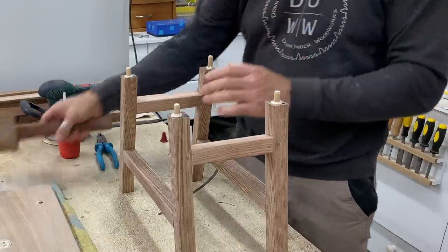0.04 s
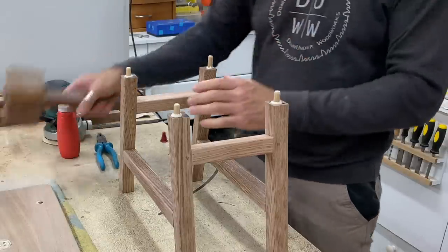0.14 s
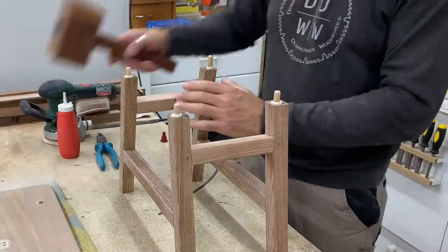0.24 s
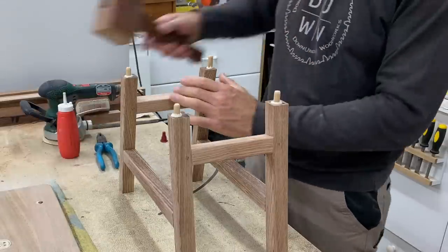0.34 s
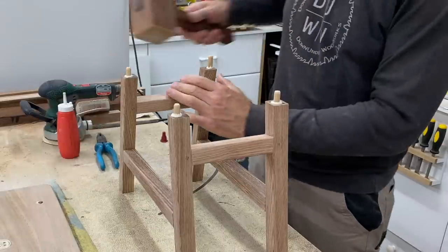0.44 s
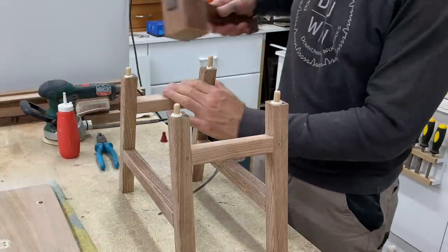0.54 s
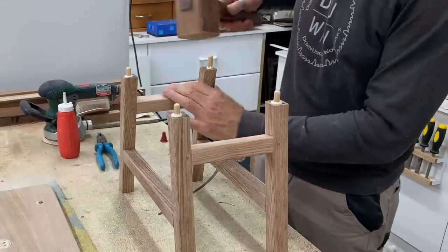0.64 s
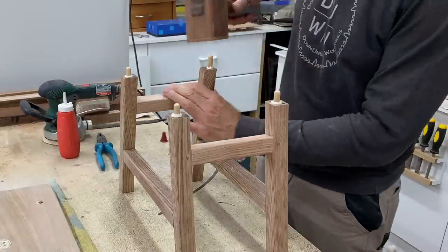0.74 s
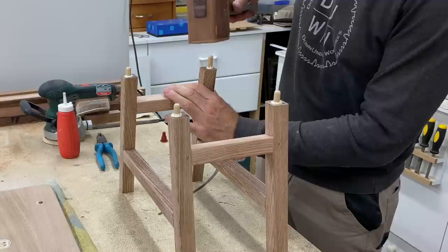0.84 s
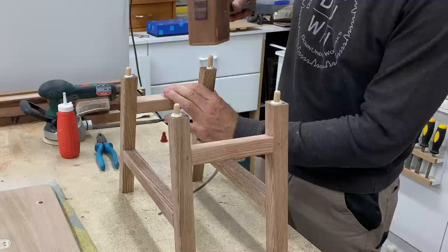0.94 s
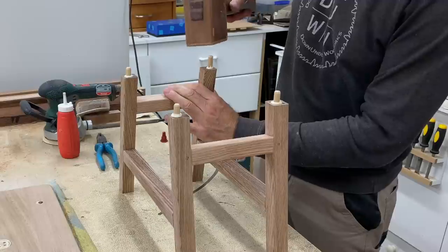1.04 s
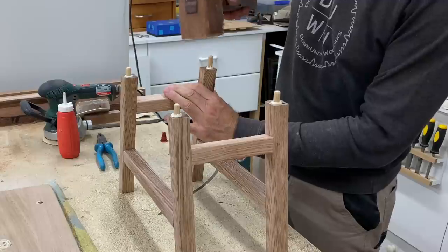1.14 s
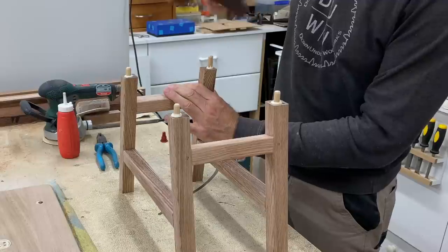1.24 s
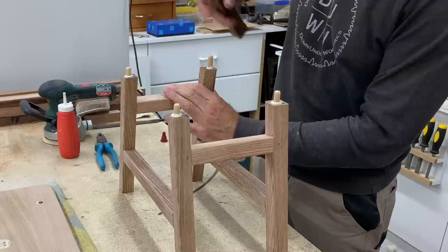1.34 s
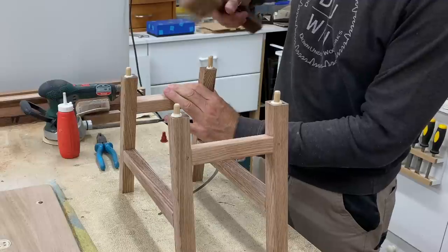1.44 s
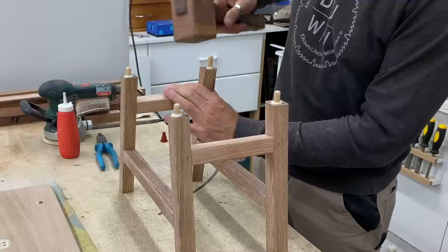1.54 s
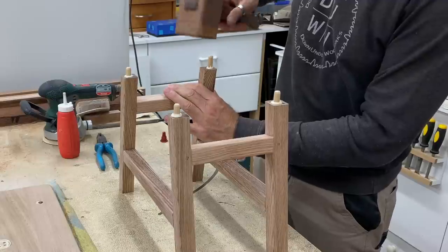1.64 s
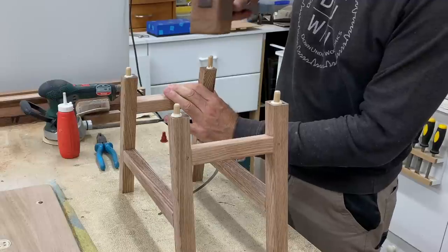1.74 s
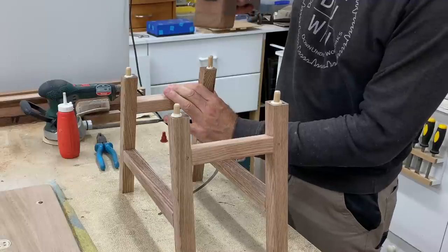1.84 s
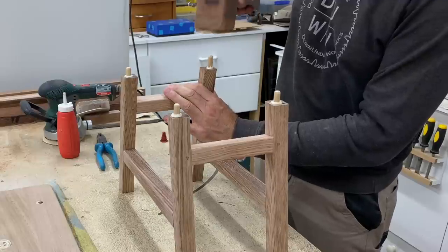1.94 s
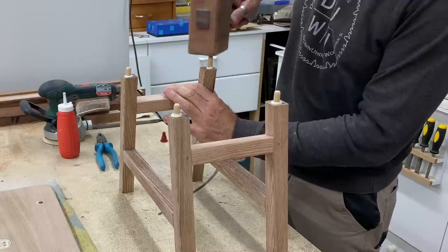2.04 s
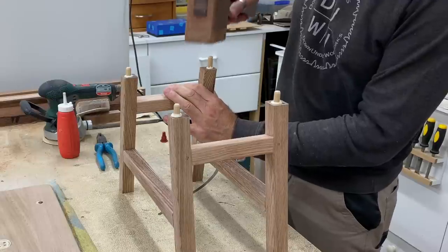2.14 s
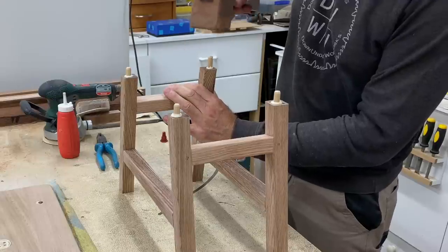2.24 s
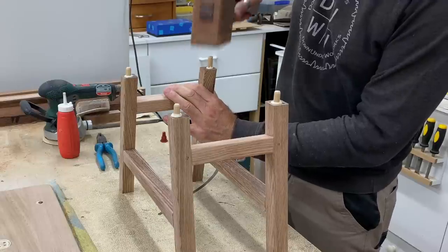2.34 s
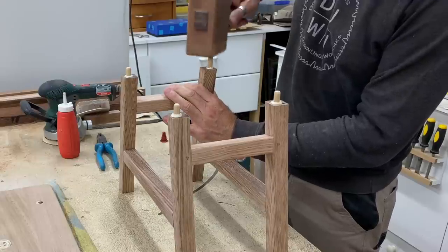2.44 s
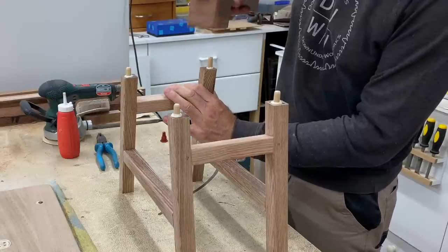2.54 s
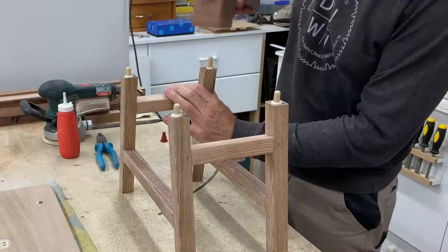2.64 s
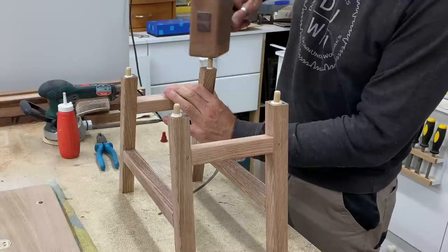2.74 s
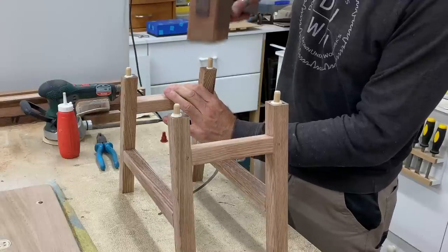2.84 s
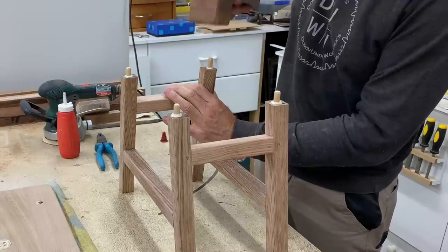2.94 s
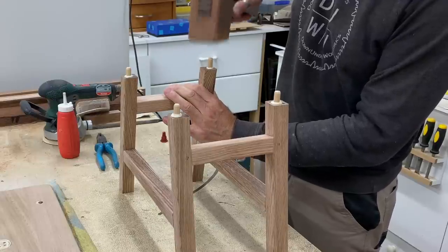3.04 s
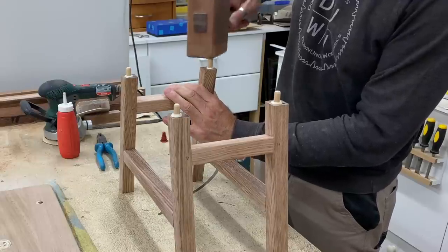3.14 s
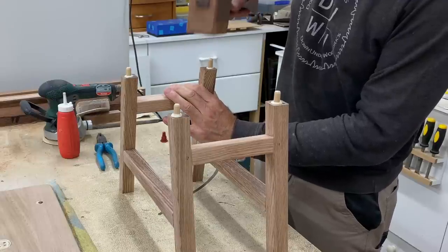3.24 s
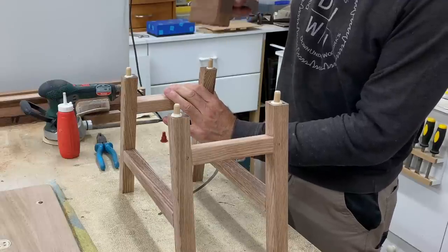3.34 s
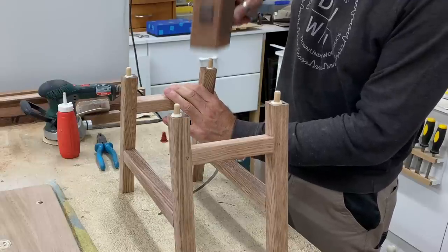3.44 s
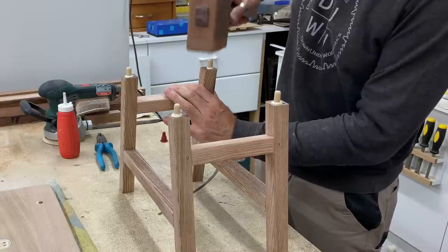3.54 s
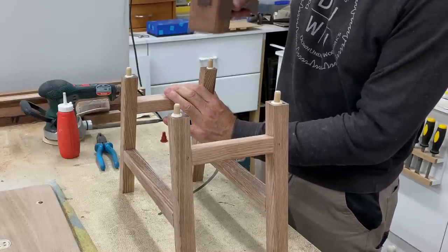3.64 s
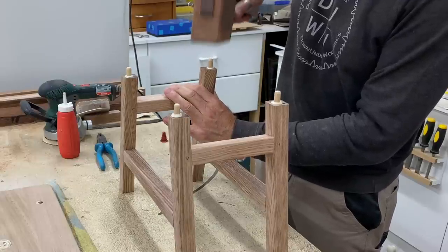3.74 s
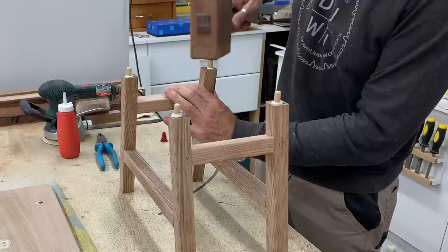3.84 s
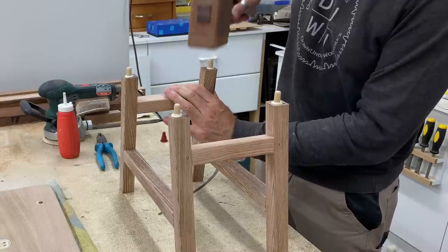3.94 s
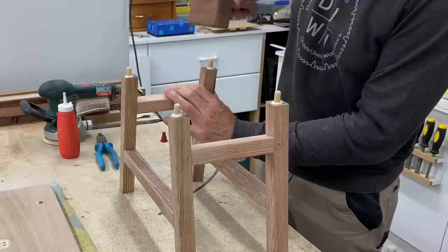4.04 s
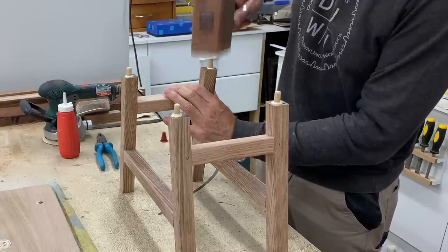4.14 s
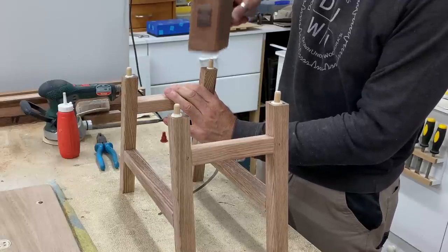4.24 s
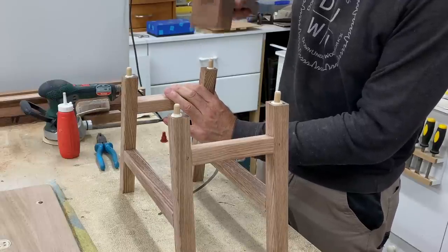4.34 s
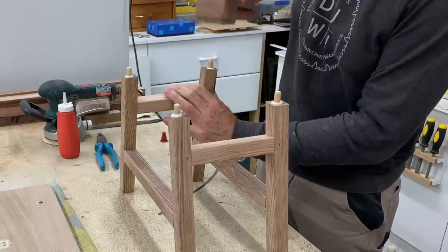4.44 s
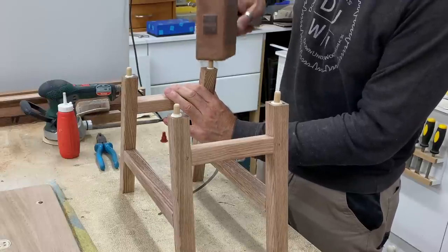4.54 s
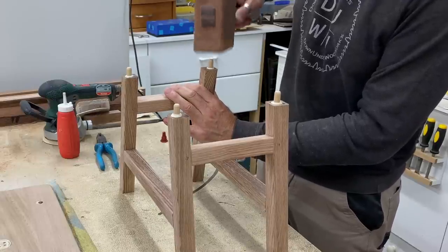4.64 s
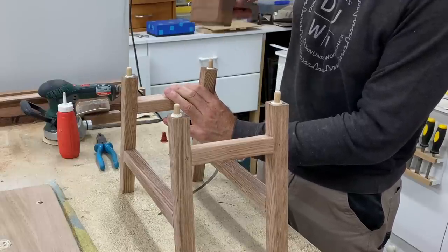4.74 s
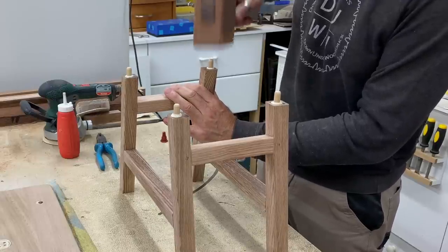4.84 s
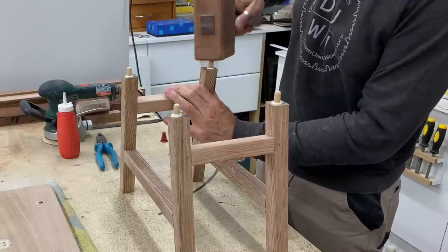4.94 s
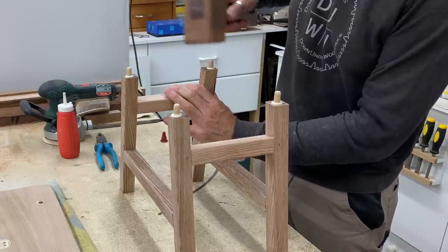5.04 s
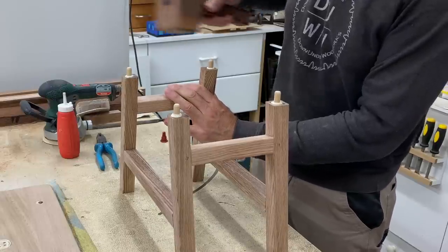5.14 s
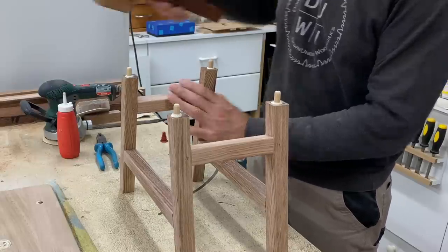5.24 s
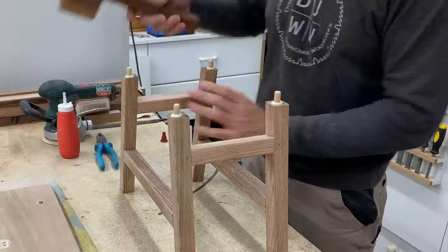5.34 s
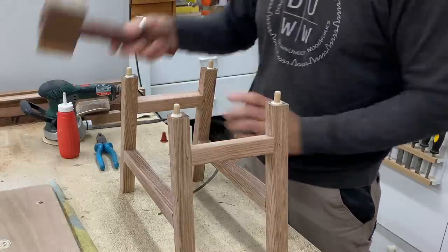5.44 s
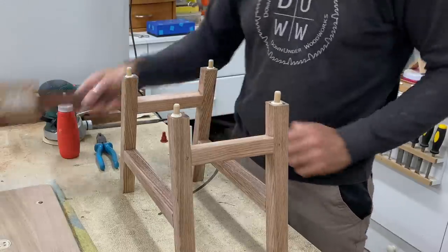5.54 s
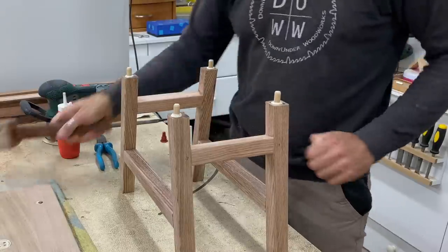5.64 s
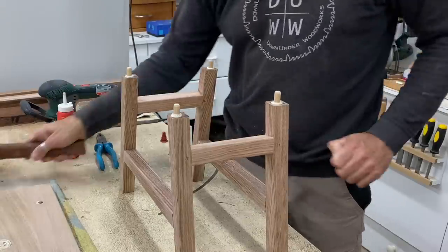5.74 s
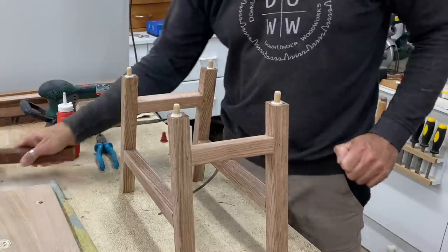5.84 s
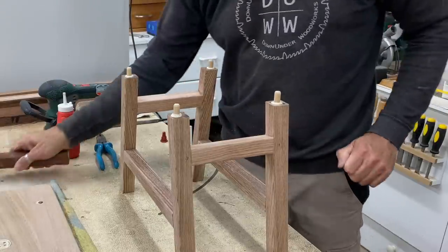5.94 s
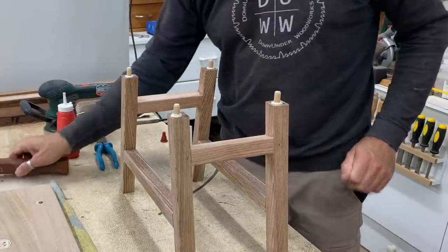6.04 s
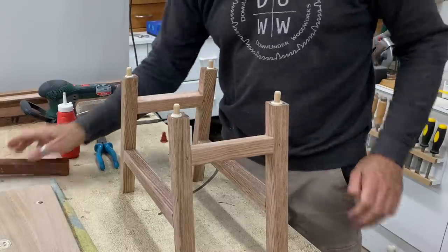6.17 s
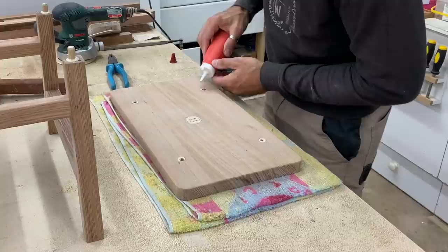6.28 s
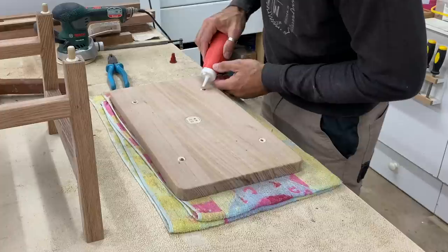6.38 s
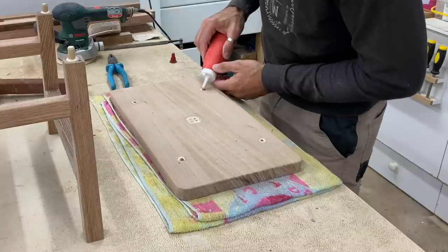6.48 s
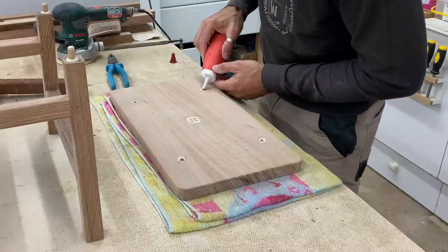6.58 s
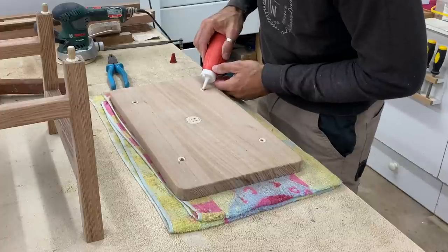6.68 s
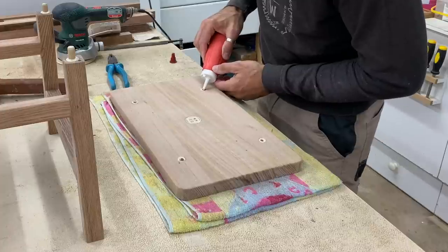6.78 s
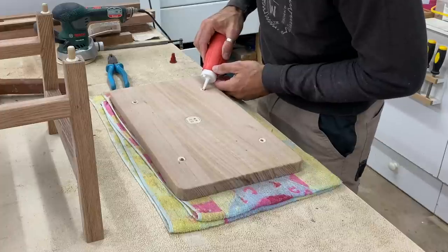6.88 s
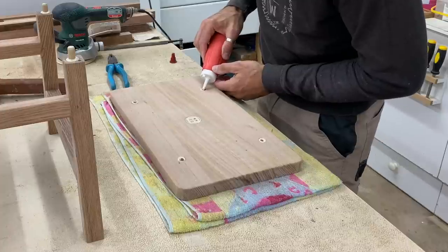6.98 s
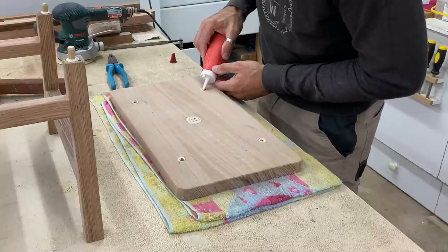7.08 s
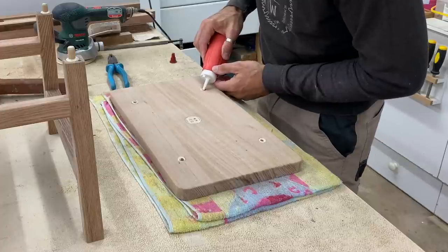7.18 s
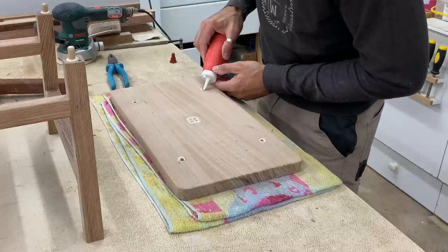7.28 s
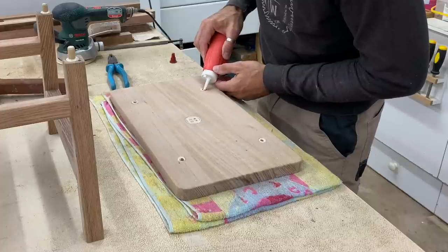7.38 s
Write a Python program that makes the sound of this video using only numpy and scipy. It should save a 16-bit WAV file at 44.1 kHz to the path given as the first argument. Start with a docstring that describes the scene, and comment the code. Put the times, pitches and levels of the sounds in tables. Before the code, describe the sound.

In a small woodworking shop with a faint low machine hum, clothes rustle and tiny ticks come from the bench. Nine evenly spaced mallet blows then hit a wooden frame, at first lighter and cracking, later louder and more solid, with bench thumps and short room echo. The mallet is set down with a quick knocking bounce and brief scrape, then the sound cuts to quiet room noise. Close stereo microphone.

```python
"""A machine hum and soft room noise come first, with rustling clothes and small ticks from the bench.
Nine mallet blows, on the whole ever firmer, seat a joint in a wooden frame on a workbench; the mallet is laid
down and slides, then a cut leads to the quiet shop. Struck wood is a sum of damped modes plus a noisy crack;
rubbing is filtered noise; the hum is wavering tones over a noise rumble; the room adds noise and echoes."""
import sys
import numpy as np
from scipy import signal
from scipy.fft import rfft, irfft
from scipy.io import wavfile
from scipy.ndimage import uniform_filter1d

SR = 44100
rng = np.random.default_rng(int(sys.argv[2]) if len(sys.argv) > 2 else 0)


def ratio_of_db(decibels):
    """Turn decibels (scalar or array-like) into linear amplitude factors; 0 dB maps to 1."""
    return 10 ** (np.asarray(decibels, float) / 20)


def materialize(psi):
    """Save the field psi as 16-bit PCM at rate SR to the path in sys.argv[1].

    A 1-D psi becomes a single channel; in a 2-D psi each row is a channel.
    """
    bounded = np.clip(np.atleast_2d(psi).T, -1, 1)
    quanta = np.round(bounded * 32767).astype(np.int16)
    wavfile.write(sys.argv[1], SR, quanta)


N = 326781

# Room noise before and after the cut. Each row: frequency in Hz, relative spectral density in dB.
AIR_SPECTRUM = [(15, -61), (25, -27.5), (63, -6), (101, -9), (152, -9.5), (178, -16), (203, -19.5),
                (306, -23), (527, -22.5), (3750, -38.5), (7740, -50.5), (9030, -53.5), (12000, -55.5),
                (15600, -100), (22000, -120)]
LATER_SPECTRUM = [(15, -46), (25, -16), (70, 2), (219, -20.5), (429, -22.5), (541, -18.5), (584, -22),
                  (776, -14), (1300, -25), (1870, -25.5), (3560, -34), (6130, -35.5), (12000, -55.5),
                  (15600, -92), (22000, -120)]
# Likeness of the two sides of each noise. Each row: frequency in Hz, left-right correlation (-1 to 1).
AIR_LIKENESS = [(60, 0.69), (130, 1), (290, 1), (640, -0.52), (1410, -0.3), (3100, 0.22), (6820, 0.9),
                (15000, -0.067)]
LATER_LIKENESS = [(60, 1), (130, 0.84), (290, 0.71), (640, -0.66), (1410, -0.34), (3100, 0.5),
                  (6820, -0.16), (15000, 0.29)]
# Course of the machine hum. Each row: time in seconds, low-tone gain in dB, high-tone level in dB,
# level of the high tone's octave in dB.
HUM_COURSE = [(0.0, -58, -58, -91), (0.44, -64.5, -54.5, -80), (0.88, -58, -50.5, -68.5),
              (1.32, -54.5, -51, -83), (1.88, -61, -60, -64), (2.1, -52, -73, -65), (2.67, -52, -58, -84),
              (3.12, -58.5, -48, -70), (3.74, -55.5, -54, -94), (4.05, -56.5, -60, -62.5),
              (4.89, -51.5, -48, -58), (5.14, -58, -49.5, -63.5), (5.58, -50, -48, -60.5),
              (5.77, -45.5, -53, -65.5), (6.12, -51, -43, -65), (6.3, -53.5, -65, -88)]
# Partials of the low tone. Each row: frequency in Hz, level in dB added to the low-tone gain.
LOW_PARTIALS = [(80.7, 3.5), (161.4, -10), (323, -30.5), (398, -29), (560, -46.5)]
# Rubs of the clothes. Each row: loudest moment in seconds, swell in seconds, fade in seconds,
# cloth hiss in dB, squeak in dB.
RUBS = [(.124, 0.004, 0.018, -53.5, -84), (.18, .03, 0.13, -64, -72), (.45, 0.17, 0.16, -71.5, -73),
        (1.3, 0.097, 0.043, -66, -64), (1.39, 0.027, 0.082, -71.5, -69), (1.504, 0.11, 0.033, -58, -66),
        (1.68, 0.11, 0.047, -70.5, -75), (4.105, .025, .1, -64.5, -80), (4.455, 0.0098, .1, -53, -79),
        (4.822, 0.01, .08, -56.5, -80), (5.35, 0.45, 0.45, -76, -76), (5.55, .04, 0.017, -67, -88),
        (5.6, 0.018, 0.029, -72, -83)]
# Colour of the cloth hiss. Each row: frequency in Hz, relative level in dB.
CLOTH_COLOUR = [(1200, -38.5), (3000, -18), (5600, -4), (7000, -10.5), (8500, -3), (12000, -7),
                (15700, -7.5), (16300, -37)]
# Partials of the squeak. Each row: frequency in Hz, width in Hz, relative level in dB.
SQUEAK_PARTIALS = [(2160, 160, 0), (4290, 300, -10), (6370, 600, -16)]
# The mallet slides on the bench. Each row: time in seconds, level in dB, scrape pitch in Hz.
SLIDE_COURSE = [(6.13, -95, 3950), (6.196, -80, 3820), (6.258, -80, 4480), (6.304, -80, 4400),
                (6.315, -76, 4160)]
# Resonances that follow the scrape. Each row: factor on the scrape pitch, width in Hz, gain in dB.
SCRAPE_BANDS = [(1.02, 320, 6.5), (0.41, 350, 9.5)]
# A fixed scrape resonance above them. The row: frequency in Hz, width in Hz, gain in dB.
SCRAPE_TOP_BAND = (6550, 450, -2)
# Small ticks and rings of hands and tools on the bench. Each row: start in seconds, level in dB,
# ring frequency in Hz, ring t60 in seconds, click share of the level.
BENCH_TICKS = [(0.1215, -48, 2120, 0.02, 0.4), (0.169, -46.5, 8650, 0.03, 0.48),
               (0.377, -63, 6160, 0.03, 0.32), (1.2738, -62, 2170, 0.077, 0.42),
               (1.3525, -43.5, 2170, 0.049, 0.47), (1.356, -54, 947, 0.12, .05),
               (1.4915, -48.5, 2110, 0.027, 0.56), (1.628, -51, 2140, 0.01, 0.69),
               (4.875, -65.5, 4470, 1.1, 0.0086), (5.5394, -62, 6140, 0.025, 0.4),
               (5.5944, -63, 2120, 0.016, 0.37), (6.107, -41.5, 2123, 0.075, 0.077)]
# Mallet blows. Each row: start in seconds, strength in dB, crack in dB, snap (mostly above 8 kHz) in dB,
# how far the joint is seated (0 to 1).
MALLET_BLOWS = [(2.02, -19, -18.5, -42, 0.17), (2.374, -19.5, -19.5, -39, 0.22),
                (2.724, -18.5, -18, -34, 0.1), (3.093, -17, -16, -32, 0.23),
                (3.4535, -14.5, -14.5, -28.5, 0.24), (3.803, -10.5, -14, -31, 0.06),
                (4.1459, -7.5, -17, -19.5, 1), (4.5071, -7, -19, -20, 0.9), (4.871, -7.5, -18.5, -19.5, 1)]
# Modes of frame with mallet head, and of the bench. Each row: frequency in Hz, level in dB with the joint
# loose, level in dB with it seated, longest t60 in seconds.
FRAME_MODES = [(209, -9.5, -9, 0.1), (243.5, -8, -7, 0.093), (286, -3, -3.5, 0.1),
               (306.4, -12.5, -10.5, 0.14), (340, -7, -4, 0.066), (402, -8, -2, 0.085), (452, -5, 0, 0.096),
               (509, -7.5, -0.5, 0.066), (534, -5, -3, 0.09), (638.3, -1, -1, 0.045),
               (723.4, -2.5, -8.5, 0.078), (734, -2, -6, 0.016), (933, 1, -24.5, 0.023),
               (1068, -1.5, -4, 0.031), (1230, -6, -6, 0.035), (1373, -15.5, -9, 0.036),
               (1728, -24, -6.5, 0.0091), (1930, -5.5, -23, 0.02), (1903, -11.5, -16.5, 0.017),
               (2560, -15, -15, 0.023), (2900, -26, -33.5, 0.026), (6530, -34.5, -45, 0.011)]
BENCH_MODES = [(30.4, -15, -18.5, .2), (53, -10, -15.5, 0.25), (66.8, -2.5, -6.5, 0.23),
               (102.5, -0.5, 1, .2), (118, -6, -0.5, .15), (138.8, -2, 0, 0.14), (162.8, -7.5, -7.5, 0.15)]
# The mallet head's own short knock. Each row: frequency in Hz, level in dB, longest t60 in seconds.
HEAD_MODES = [(780, 0, .022)]
# Bench top under the mallet as it is laid down. Each row: frequency in Hz, level in dB,
# longest t60 in seconds.
TOP_MODES = [(129.2, -1.5, 0.078), (167, -5.5, 0.12), (220, 3, 0.036), (250, -18, 0.26), (280, -2.5, 0.036),
             (338, -3, 0.11), (381, -7.5, 0.14), (413.5, -8.5, 0.13), (483, 2, 0.022), (543, 1, 0.071),
             (633.6, 0, 0.083), (738, -1.5, 0.069), (870, 5, 0.033), (1024, 4.5, 0.017), (1188, 2.5, 0.028),
             (1405, 1.5, 0.021), (1920, -18, 0.021)]
# The mallet touches down, lands, bounces and rocks. Each row: start in seconds, strength in dB,
# crack in dB, contact time constant in ms.
LAYING_DOWN = [(5.9549, -18.5, -35.5, 0.2), (5.967, -11.5, -20.5, 0.17), (5.982, -16.5, -41, 0.26),
               (5.995, -22.5, -51, 0.18), (6.021, -30, -53, 0.24), (6.107, -25.5, -44, 0.12),
               (6.113, -30.5, -36, 0.13)]
# Colours of a blow's crack, its snap, and the knock of laying down. Each row: frequency in Hz,
# relative level in dB.
CRACK_COLOUR = [(700, -38.5), (1500, 1), (2700, -2), (3800, -13), (6300, -10.5), (8500, -13), (11000, -23)]
SNAP_COLOUR = [(6000, -51), (9000, -2), (13000, 0), (15600, -0.5), (16500, -36)]
KNOCK_COLOUR = [(500, -15), (1200, 2), (2100, 0.5), (3500, -13.5), (6000, -24), (9000, -38), (16000, -35)]
# Reverberation time of the shop. Each row: frequency in Hz, t60 in seconds.
SHOP_T60 = [(60, .5), (160, 0.53), (420, 0.37), (1100, 0.38), (2900, 0.37), (7700, 0.37), (11000, 0.28),
            (16000, .14)]
# Strength of the echo. Each row: frequency in Hz, level in dB, left-right correlation.
ECHO_STRENGTH = [(60, -11, 1), (147.7, -6, .85), (360, 1, 0.69), (800, -4.5, 0.54), (1460, 1, 0.36),
                 (3000, 5.5, 0.23), (6500, 6.5, 0.47), (16000, -1.5, 0.087)]
# How a wide source differs at the two ports. Each row: frequency in Hz, phase swing of either side in radians,
# excess of the left in dB.
PORT_DIFFERENCE = [(60.5, 0.041, 2.5), (253, 0.18, 0.4), (600, 0.39, 1), (1400, 0.32, -1.5),
                   (2930, 0.44, 1), (4200, 0.58, 7), (6000, 0.2, -1.5)]
# Phase between the sides of the treble. Each row: frequency in Hz, half-turns by which the right leads.
PHASE_TURN = [(7300, .01), (8300, 0.48), (8900, .99), (9600, 1.294), (10600, 1.63), (11600, 2.2),
              (12400, 2.6), (13350, 3.01), (14200, 3.6), (14900, 3.4), (17000, 11)]


def evened(x):
    """Normalization: scales a signal to an rms of 1."""
    return x / np.sqrt(np.mean(x ** 2) + 1e-20)


def read(points, hz):
    """Interpolation along the logarithm of frequency."""
    f, value = np.transpose(points)
    return np.interp(np.log(hz + 1), np.log(f + 1), value)


def add(mix, s, sound):
    """Superposition: adds a sound to the mix from s seconds on."""
    part = mix[round(s * SR):][:len(sound)]
    part += sound[:len(part)]


def coloured(x, points):
    """Linear filtering: multiplies the spectrum of x by a (Hz, dB) curve, without phase shift."""
    return irfft(rfft(x) * ratio_of_db(read(points, np.fft.rfftfreq(len(x), 1 / SR))), len(x))


def resonate(x, hz, width):
    """Resonance by heterodyning: x is shifted down by hz, smoothed by two poles and shifted back."""
    carrier = np.exp(2j * np.pi * np.cumsum(hz * np.ones(len(x))) / SR)
    pole = np.exp(-np.pi * width / SR)
    smooth = signal.lfilter([1], np.convolve([1, -pole], [1, -pole]), x / carrier)
    return evened((carrier * smooth).real)


def partly_alike(a, b, likeness):
    """Partial coherence: mixes two independent spectra to a given left-right correlation."""
    same = np.clip(likeness, -1, 1)
    return np.array([a, same * a + np.sqrt(1 - same ** 2) * b])


def air(spectrum, level_db, likeness):
    """Stationary, partly coherent room noise; its level is that of the mean of both sides above 200 Hz."""
    hz = np.fft.rfftfreq(N, 1 / SR)
    a, b = rfft(rng.standard_normal((2, N)))
    z = partly_alike(a, b, read(likeness, hz)) * ratio_of_db(read(spectrum, hz))
    return ratio_of_db(level_db) * irfft(z, N) / np.std(irfft(z.mean(0) * (hz > 200), N))


def hum():
    """Periodic excitation: two wavering tones with overtones, the high one sagging, over narrow-band rumble."""
    high_hz, sag_hz_per_s = 151.5, 0.45
    rumble_db, rumble_db_per_s, rumble_swell_db = -59, 1.25, 1
    s, *levels = np.transpose(HUM_COURSE)
    low_db, high_db, octave_db = (np.interp(T, s, level) for level in levels)
    noise = rng.standard_normal((4, N))
    waver = evened(uniform_filter1d(uniform_filter1d(noise[1:3], 1500), 1500))
    swell = evened(uniform_filter1d(uniform_filter1d(noise[3], 6000), 6000))
    low = sum(ratio_of_db(db) * np.sin(2 * np.pi * f * T + .5 * waver[1] * f / 80) for f, db in LOW_PARTIALS)
    phase = 2 * np.pi * np.cumsum(high_hz - sag_hz_per_s * T) / SR
    high = ratio_of_db(high_db) * (np.sin(phase) + ratio_of_db(-30) * np.sin(3 * phase))
    high += ratio_of_db(octave_db) * np.sin(2 * phase)
    tones = ratio_of_db(low_db + 2.0 * waver[1]) * low + ratio_of_db(0.98 * waver[0]) * high
    rumble = ratio_of_db(rumble_db + rumble_db_per_s * T + rumble_swell_db * swell) * resonate(noise[0], 62.5, 28)
    return rumble + np.sqrt(2) * tones  # a sine of peak sqrt(2) has an rms of 1


def rustle(hiss_grain, squeak_grain):
    """Friction noise of cloth: grainy hiss with a faint squeak on three resonances, swelling and fading."""
    hiss = evened(coloured(hiss_grain, CLOTH_COLOUR))
    squeak = evened(sum(ratio_of_db(db) * resonate(squeak_grain, hz, w) for hz, w, db in SQUEAK_PARTIALS))
    out = np.zeros(N)
    for s, swell, fade, hiss_db, squeak_db in RUBS:
        near = slice(max(round((s - 3 * swell) * SR), 0), round((s + 3 * fade) * SR))
        away = np.maximum((s - T[near]) / swell, (T[near] - s) / fade)
        envelope = ratio_of_db(-20 * away)  # 20 dB down at one swell before or one fade after the loudest moment
        out[near] += envelope * (ratio_of_db(hiss_db) * hiss[near] + ratio_of_db(squeak_db) * squeak[near])
    return out


def slide(grain):
    """Sliding friction of wood on wood: noise through resonances that follow the scrape pitch."""
    s, db, hz = np.transpose(SLIDE_COURSE)
    pitch = np.interp(T, s, hz)
    scrape = sum(ratio_of_db(d) * resonate(grain, k * pitch, w) for k, w, d in SCRAPE_BANDS)
    top_hz, top_width, top_db = SCRAPE_TOP_BAND
    scrape += ratio_of_db(top_db) * resonate(grain, top_hz, top_width)
    return uniform_filter1d(ratio_of_db(np.interp(T, s, db, -120, -120)), 441) * scrape


def movements():
    """Friction as random excitation: noise of randomly varying loudness drives the rustle and the slide."""
    loudness = evened(uniform_filter1d(rng.standard_normal((3, N)), 250))
    grain = rng.standard_normal((3, N)) * ratio_of_db(2.4 * loudness)
    return rustle(grain[0], grain[1]) + slide(grain[2])


def ticks():
    """Impulsive excitation of one damped mode: a noise click and a short ring each."""
    out, t = np.zeros(N), np.arange(SR // 2) / SR
    for s, db, hz, t60, share in BENCH_TICKS:
        drift = .1 * np.cumsum(rng.standard_normal(len(t)))  # phase wander makes the ring fuzzy
        click = share * rng.standard_normal(len(t)) * ratio_of_db(-60 * t / 0.0043)
        add(out, s, ratio_of_db(db) * (np.sin(2 * np.pi * hz * t + drift) * ratio_of_db(-60 * t / t60) + click))
    return out


def settled(modes, seated):
    """Change of boundary condition: mode levels move from loose to seated as the joint closes."""
    hz, loose_db, seated_db, t60 = np.transpose(modes)
    return np.transpose([hz, loose_db + np.clip(seated, 0, 1) * (seated_db - loose_db), t60])


def ring(modes, contact_ms, rise_cycles, spread_db):
    """Modal superposition: damped modes pushed by a soft contact; the bass builds up last. Peak is 1."""
    t = np.arange(SR // 2) / SR
    hz, db, t60 = np.transpose(modes)[:, :, None]
    t60 = np.minimum(t60, 48 / hz)  # wood rings for few cycles
    db = db + spread_db * rng.standard_normal(db.shape)  # the balance of modes varies at random
    sign = (-1) ** np.arange(len(hz))[:, None]
    build_up = 1 - np.exp(-t * hz / rise_cycles)
    body = (sign * ratio_of_db(db - 60 * t / t60) * build_up * np.sin(2 * np.pi * hz * t)).sum(0)
    u = t[:300] * 1000 / np.clip(contact_ms, .02, 1)
    body = np.convolve(body, u * np.exp(-u))[:len(t)]  # longer contact, duller blow
    return body / abs(body).max()


def crack(colour, grit, t60):
    """Impact of wood on wood: columns are a clean click of peak 1, and the decaying gritty noise with it."""
    t = np.arange(1024) / SR
    impulse = 1. * (np.arange(len(t)) == 39)  # leaves room for the filter to spread both ways
    click = coloured(impulse, colour)
    wake = coloured(rng.standard_normal(len(t)) * ratio_of_db(-60 * t / t60), colour)
    return np.array([click, grit * wake]).T / abs(click).max()


def mallet_blows(out):
    """Impact excitation: each blow rings frame and mallet head, thumps the bench and cracks."""
    for s, db, crack_db, snap_db, seated in MALLET_BLOWS:
        ms = 0.049 + 0.021 * seated  # a seated joint takes the blow for longer
        frame = ring(settled(FRAME_MODES, seated), ms, rise_cycles=0.033, spread_db=1.5)
        head = ring(HEAD_MODES, ms, rise_cycles=.3, spread_db=0)
        thump = ring(settled(BENCH_MODES, seated), 0.13, rise_cycles=0.67, spread_db=2.5)
        add(out[:, 0], s, ratio_of_db(db) * frame)
        add(out[:, 0], s, ratio_of_db(db - 3) * head)
        add(out[:, 0], s, ratio_of_db(-12 + 0.48 * db) * thump)  # the thump grows more slowly than the blow
        add(out, s, ratio_of_db(crack_db) * crack(CRACK_COLOUR, grit=0.2, t60=0.048))
        add(out, s, ratio_of_db(snap_db) * crack(SNAP_COLOUR, grit=0.18, t60=0.012))


def mallet_laid_down(out):
    """Repeated impact: the head knocks the modes of the bench top as it lands, bounces and rocks."""
    for s, db, crack_db, ms in LAYING_DOWN:
        add(out[:, 0], s, ratio_of_db(db) * ring(TOP_MODES, ms, rise_cycles=0.43, spread_db=3.0))
        add(out, s, ratio_of_db(crack_db) * crack(KNOCK_COLOUR, grit=0.2, t60=0.015))


def mallet():
    """Superposition of all impacts of the mallet; rows are the blows and their grit."""
    out = np.zeros((N, 2))
    mallet_blows(out)
    mallet_laid_down(out)
    return out.T


def shop(x):
    """Reverberation: sparse echoes of random sign, each band decaying at its own rate."""
    taps = np.zeros((2, SR))
    at = np.arange(120, SR - 20, 20) + rng.integers(0, 20, (2, (SR - 121) // 20))
    np.put_along_axis(taps, at, rng.choice([-1., 1.], at.shape), 1)
    hz, t, (a, b) = signal.stft(taps, SR, nperseg=512)
    t60 = read(SHOP_T60, hz)[:, None]
    strength = np.array(ECHO_STRENGTH)
    db = read(strength[:, [0, 1]], hz)[:, None]
    z = partly_alike(a, b, read(strength[:, [0, 2]], hz)[:, None])
    z *= ratio_of_db(db - 60 * t / t60) / np.sqrt(t60 * 160)  # the root offsets the greater energy of long decays
    return signal.fftconvolve(x[None], signal.istft(z, SR, nperseg=512)[1], axes=1)[:, :N]


def echoes(x):
    """Diffuse reverberation: random echo patterns are cross-faded, so that no single one colours every tail."""
    # the three patterns fade into one another at 0.93 half-cycles per second
    share = [np.sqrt(2 / 3) * np.cos(np.pi * (0.93 * T + k / 3)) for k in range(3)]
    return sum(shop(x * w) for w in share)


def ports(x):
    """Phase and level differences of a wide source at two ports: opposite phase swings along the spectrum."""
    hz = np.fft.rfftfreq(N, 1 / SR)
    difference = np.array(PORT_DIFFERENCE)
    swing, db = (read(difference[:, [0, k]], hz) for k in (1, 2))
    ripple = np.sin(2 * np.pi * hz * 0.0059)  # one swing to and fro per 1 / 0.0059 Hz
    half = ratio_of_db(db / 2) * np.exp(1j * swing * ripple)
    return irfft(rfft(x) * [half, 1 / half], N)


def scene():
    """Superposition of direct sound, echo and room noise, then a hard cut to the quiet shop."""
    cut_s, fade_s = 6.318, 0.0029
    blows, grit = mallet()
    near = blows + ticks() + movements()
    first = ports(near + grit + hum()) + echoes(near)  # grit and hum send no echo
    air_rise = ratio_of_db(-7 * np.exp(-T / 4))  # the noise starts 7 dB softer and fills in, time constant 4 s
    first += air_rise * air(AIR_SPECTRUM, -60.5, AIR_LIKENESS)
    fade = np.clip((cut_s - T) / fade_s, 0, 1)
    return first * fade + air(LATER_SPECTRUM, -67, LATER_LIKENESS) * (1 - fade)


def low_pass(x):
    """Removes everything above the highest recorded frequency."""
    return signal.sosfilt(signal.butter(12, 16960, fs=SR, output="sos"), x)


def record(dry):
    """Saturation, second-order bass roll-off at 45 Hz, and one treble signal turned in phase between sides."""
    x = .44 * np.tanh(dry / .44)
    hz = np.fft.rfftfreq(N, 1 / SR)
    left, right = rfft(x) / np.sqrt(1 + (45 / (hz + 1)) ** 4)
    mono = np.clip((hz - 5600) / 1200, 0, 1)  # from 6800 Hz up both sides carry the left signal
    right = np.sqrt(mono) * left + np.sqrt(1 - mono) * right
    turn = np.exp(.5j * np.pi * read(PHASE_TURN, hz))  # half the phase difference for each side
    mix = irfft([left / turn, right * turn], N)
    return low_pass(mix)


T = np.arange(N) / SR  # time in seconds
dry = scene()
out = record(dry)
materialize(out)
```